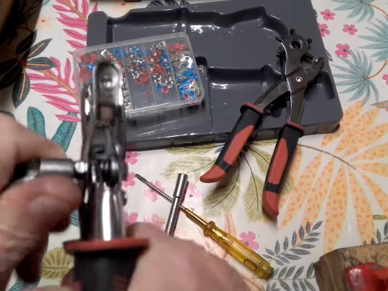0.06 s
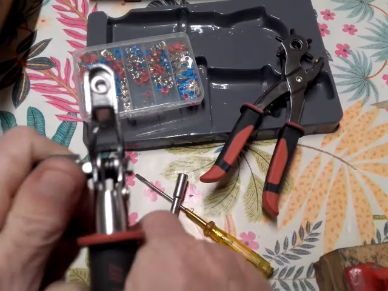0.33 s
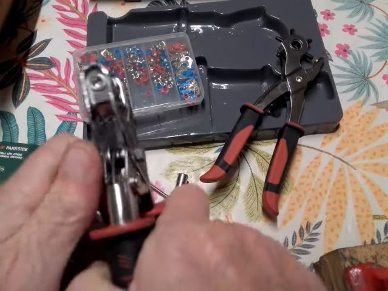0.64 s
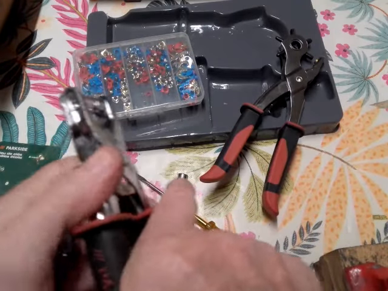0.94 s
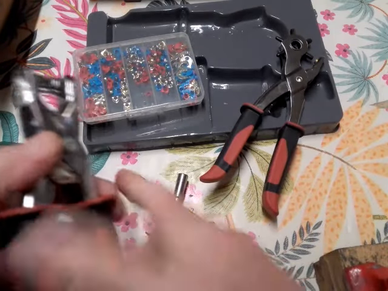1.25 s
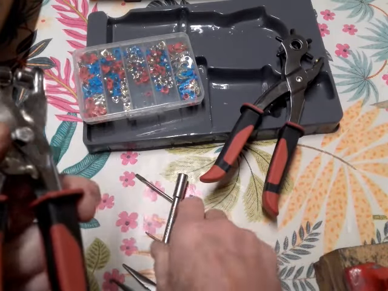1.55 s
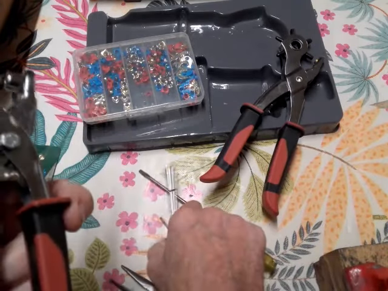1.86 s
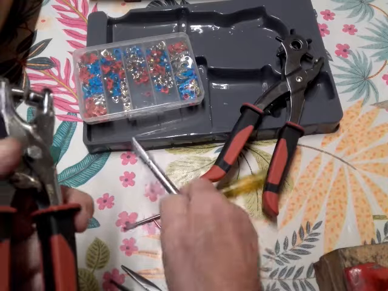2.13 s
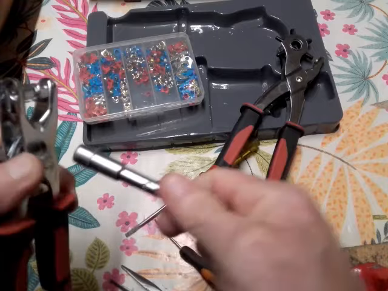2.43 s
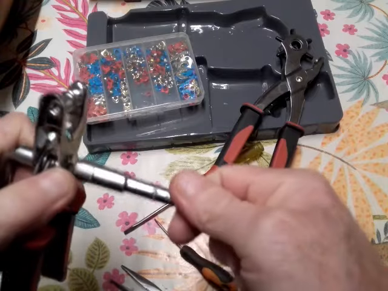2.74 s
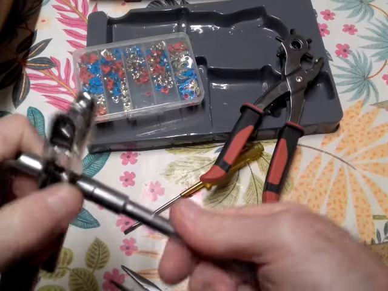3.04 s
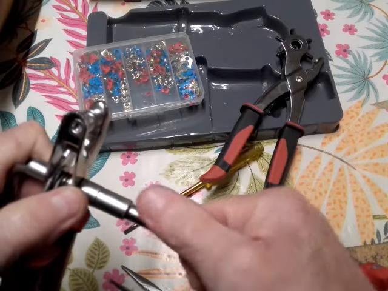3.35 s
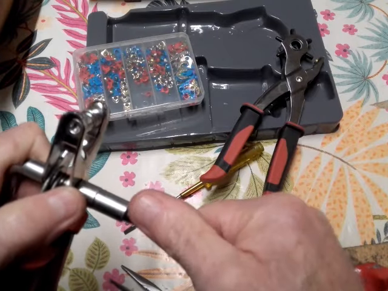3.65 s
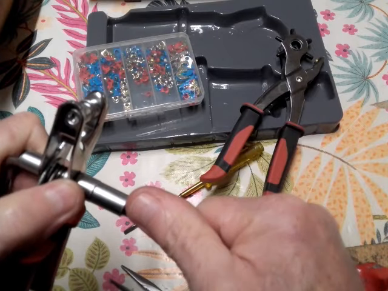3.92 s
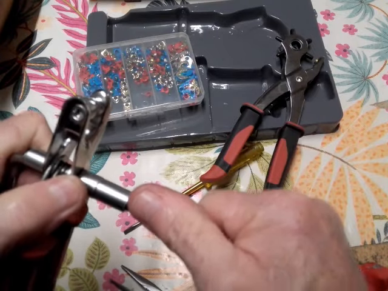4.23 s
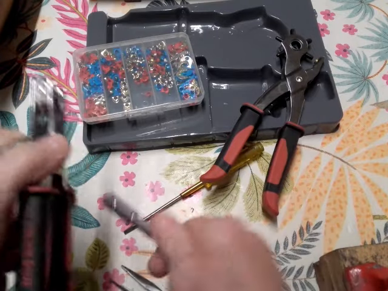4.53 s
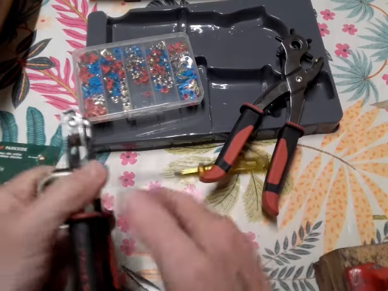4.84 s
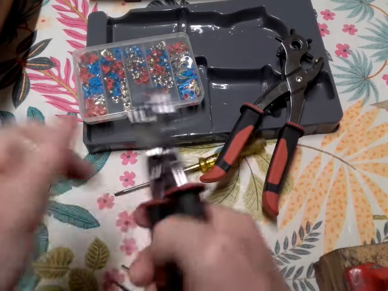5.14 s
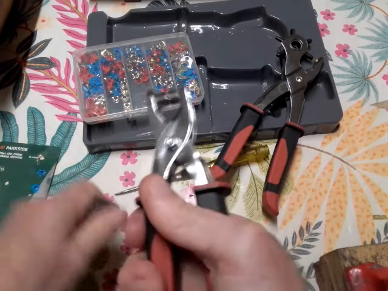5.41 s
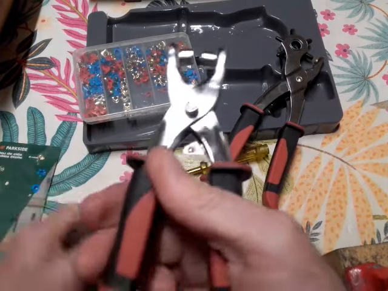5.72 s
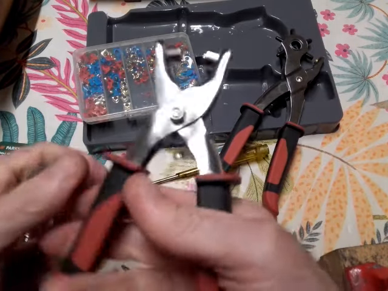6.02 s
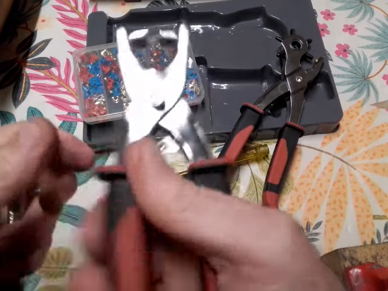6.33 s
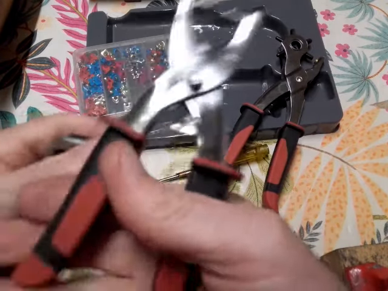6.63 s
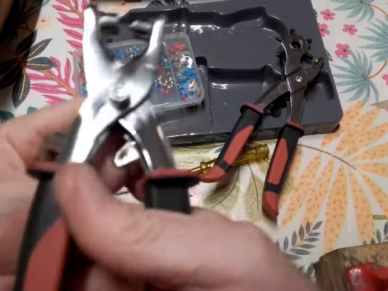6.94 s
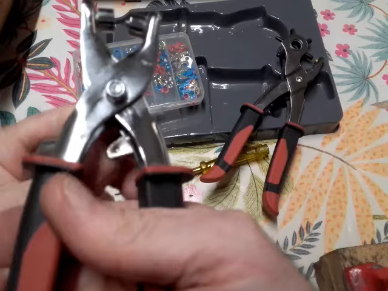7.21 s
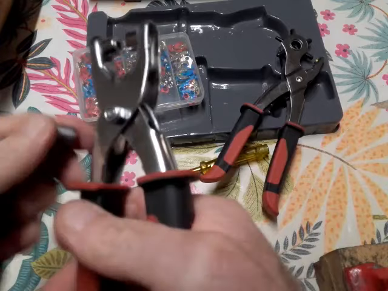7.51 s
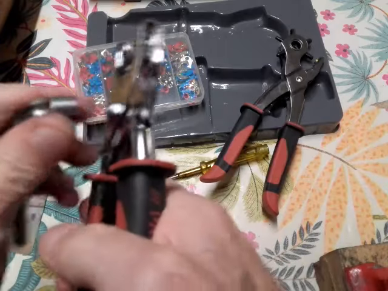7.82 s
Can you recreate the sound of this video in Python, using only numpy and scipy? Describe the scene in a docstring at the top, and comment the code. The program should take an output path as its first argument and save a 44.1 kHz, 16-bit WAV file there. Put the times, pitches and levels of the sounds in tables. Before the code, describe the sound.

Over low hiss in a small room, the loose joint of metal pliers clicks now and then. A metal tube clinks and knocks as it is lifted, and taps lightly against the jaws. Then comes the loudest sound: the tube falls on the table near the microphone, clacking several times and ringing thinly as it tumbles. Afterwards the pliers click again and rub softly as they swing open and shut.

```python
"""Faint clicks of steel eyelet pliers over low hiss: one microphone near a table in a small, quiet room.
The loose joint clicks and rubs as the jaws swing. A steel tube is picked up with a clink, tried in the
jaws, then dropped: it bounces on the tabletop, its bending modes ringing as it tumbles.
The room answers briefly, and the recorder's noise suppressor turns the quiet tails down."""
import sys
import numpy as np
from scipy import signal
from scipy.fft import rfft, irfft, next_fast_len
from scipy.io import wavfile
from scipy.ndimage import uniform_filter1d, map_coordinates

SR = 44100
rng = np.random.default_rng(int(sys.argv[2]) if len(sys.argv) > 2 else 0)


def dump_mix(stems):
    """Bounce the given channels to the path in sys.argv[1] as a 16-bit WAV at rate SR."""
    frames = np.atleast_2d(stems).T  # one column per channel
    limited = np.clip(frames, -1, 1)  # hard clip at full scale
    pcm = np.round(limited * 32767).astype(np.int16)
    wavfile.write(sys.argv[1], SR, pcm)


N = 347067
T = np.arange(SR * 3 // 5) / SR  # time axis of one hit
HZ = np.fft.rfftfreq(len(T), 1 / SR)


def amp(db):
    """Decibels to amplitude."""
    return 10 ** (np.asarray(db) / 20)


def along(points, hz):
    """Interpolate (f/Hz, value) points on a log frequency axis."""
    f, v = np.transpose(points)
    return np.interp(np.log(hz + 1), np.log(f + 1), v)


def fade(t60, t=T):
    """Exponential decay by 60 dB in t60 seconds."""
    return np.exp(-np.log(1000) * t / t60)


def tone(hz, t60):
    """One struck mode."""
    return np.sin(2 * np.pi * hz * T) * fade(t60)


def chatter(t60):
    """The dying burst of micro-impacts in one contact."""
    return rng.standard_normal(len(T)) * fade(t60)


def struck(x):
    """Scale a hit to rms 1 over its first 6 ms."""
    return x / np.sqrt(np.mean(x[T < .006] ** 2) + 1e-20)


def coloured(x, db):
    """Causal filter with the given gain on the HZ grid."""
    cepstrum = irfft(np.log(np.maximum(amp(db), 1e-6)), len(T))
    fold = 1 + np.sign(len(T) / 2 - np.arange(len(T)))
    fold[0] = 1
    return irfft(rfft(x) * np.exp(rfft(cepstrum * fold)), len(T))


def shelf(db, corner_hz):
    """A step of db above the corner."""
    return db * HZ ** 6 / (HZ ** 6 + corner_hz ** 6)


def radiated(x, corner_hz):
    """A small body radiates little below its corner."""
    return coloured(x, -10 * np.log10(1 + (corner_hz / (HZ + 1)) ** 4))


def resonate(x, modes):
    """Pass x through parallel (f/Hz, width/Hz, level/dB) resonances."""
    response = sum(amp(db) * 1j * HZ * width / (hz * hz - HZ ** 2 + 1j * HZ * width)
                   for hz, width, db in modes)
    return irfft(rfft(x) * response, len(T))


def add(track, s, x):
    """Mix x into the track at time s."""
    part = track[max(round(s * SR), 0):][:len(x)]
    part += x[:len(part)]


# Noise floor at the microphone: f/Hz, relative density/dB
FLOOR_SPECTRUM = [(12, -29), (20, 3.5), (22, -16.5), (32, -26.5), (65, -14), (187, -12.5), (233, -12),
                  (308, -11.5), (469, -11.5), (775, -13), (1600, -16.5), (6290, -30.5), (13700, -24),
                  (15800, -26)]
def hiss(rms_db=-65.5):
    """Still room air and the microphone's own hiss, ahead of the noise suppressor."""
    gain = amp(along(FLOOR_SPECTRUM, np.fft.rfftfreq(N, 1 / SR)))
    noise = irfft(rfft(rng.standard_normal(N)) * gain, N)
    return amp(rms_db) * noise / np.std(noise)


# Reverberation of the small room: f/Hz, t60/s
ROOM_DECAY = [(150, .38), (300, .3), (600, .28), (1500, .26), (4000, .235), (8000, .23), (15000, .2)]
def room(x, build_s=0.0033):
    """The diffuse answer of the room, different for each place of contact."""
    hz, t, bands = signal.stft(rng.standard_normal(len(T)), SR, nperseg=256)
    bands = bands * fade(along(ROOM_DECAY, hz)[:, None], t)
    tail = signal.istft(bands, SR, nperseg=256)[1][:len(T)]
    tail *= 1 - np.exp(-(T / build_s) ** 2)
    return signal.fftconvolve(x, tail / np.linalg.norm(tail))[:len(T)]


# Contacts of the pliers over the table: t/s, level/dB, treble shelf/dB, favoured mode f/Hz
PLIER_CONTACTS = [(0.023, -55.5, -9, 2120), (0.1283, -54.5, -11, 1980), (0.594, -29.5, -1, 6800),
                  (0.598, -30, -6, 3350), (.682, -47, -4.5, 3500), (.855, -50.5, -3, 3940),
                  (1.142, -51.5, 4.5, 2130), (1.224, -63, 2, 2200), (2.7337, -35, -12, 2920),
                  (2.785, -53, -7, 2520), (2.804, -51.5, -11, 2430), (2.8568, -47.5, -3.5, 3130),
                  (2.883, -52, -11, 1130), (2.943, -64, -11, 1130), (2.986, -51, -12.5, 2700),
                  (3.004, -56, -11, 1050), (3.027, -48, -7.5, 3190), (3.1008, -35.5, -9, 3160),
                  (3.158, -48.5, -4, 1110), (3.1712, -27.5, -2, 3030), (3.397, -52, 2, 4240),
                  (3.4033, -41, 7, 3960), (5.1644, -40, 7, 1100), (5.519, -66, 15, 3280),
                  (5.5273, -40, -11, 3400), (7.411, -61.5, 3, 5080)]
# Resonances of the jaws: f/Hz, width/Hz, level/dB
JAW_MODES = [(3210, 360, -9.5), (3412, 180, 3), (3960, 220, -4.5), (5910, 63, -13), (6717, 123, 5),
             (7510, 140, -11.5), (7860, 34, -8.5), (8550, 120, -5), (10350, 116, -3.5), (11440, 44, 0.5)]
# Spectrum of the steel's click: f/Hz, level/dB
STEEL_SPECTRUM = [(100, -36.5), (600, -32.5), (1200, -45.5), (1700, -7.5), (2300, 2.5), (3300, 1),
                  (4200, 0.5), (4900, -2.5), (6600, 6.5), (8500, -2), (12000, -12), (14000, -15),
                  (16000, -45.5)]
# Spectrum of the knock in the handles: f/Hz, level/dB
HANDLE_SPECTRUM = [(50, -60.5), (130, -15.5), (300, -7.5), (700, -2), (1100, 0.5), (1600, -0.5), (2500, 3),
                   (5000, -59.5)]
def pliers(ring_db=5, chatter_t60=0.023, fist_from_s=5.35):
    """Each contact chatters in the hand-damped jaws and knocks the handles; harder ones are more steel."""
    out = np.zeros(N)
    for s, db, treble_db, ping_hz in PLIER_CONTACTS:
        force_db = db + 45  # relative to a firm click
        ping_db = -0.5 - 0.34 * force_db
        knock_db = -7.5 - 0.4 * force_db
        force = chatter(chatter_t60)
        steel = coloured(force, along(STEEL_SPECTRUM, HZ)) + amp(ring_db) * resonate(force, JAW_MODES)
        steel = struck(coloured(steel, shelf(treble_db, corner_hz=4930)))
        ping = struck(tone(ping_hz, t60=0.0176))  # grip and contact point favour one mode
        click = struck(radiated(steel + amp(ping_db) * ping, corner_hz=1000))
        # the long arms bend, at a lower pitch once they lie in the fist
        lever_hz = (1097 if s < fist_from_s else 410) * rng.normal(1, 0.0153)
        lever = struck(radiated(tone(lever_hz, t60=0.054), corner_hz=284))
        handles = struck(coloured(chatter(chatter_t60), along(HANDLE_SPECTRUM, HZ)))
        knock = amp(knock_db) * struck(handles + amp(-2) * lever)
        if 2.6 < s < 3.3:  # the tube lies between the jaws: its lowest mode answers
            click += amp(knock_db - 5) * struck(radiated(tone(2520, t60=.09), corner_hz=1000))
        add(out, s, amp(db) * (click + knock + amp(-11) * room(steel) + amp(-7) * room(knock)))
    return out


# Rubs as the jaws swing or the tube slides between them: t/s, level/dB
STEEL_RUBS = [(.516, -68.5), (0.614, -49.5), (2.766, -63), (3.135, -63.5), (5.514, -65), (5.712, -70),
              (6.084, -68.5), (6.435, -62), (6.625, -70), (6.747, -69)]
# Resonances of the rubbing joint: f/Hz, width/Hz, level/dB
JOINT_MODES = [(1948, 330, 5.5), (3500, 680, 0.5), (6600, 910, -1), (7850, 460, -6)]
def joint(grain_db=4, room_db=-8, swell_s=0.016, peak_s=.1):
    """Tiny slips of steel on steel swell and fade with each swing of the jaws."""
    out = np.zeros(N)
    for s, db in STEEL_RUBS:
        friction = rng.standard_normal(len(T)) * amp(grain_db * rng.standard_normal(len(T)))
        slips = resonate(friction, JOINT_MODES)
        rub = slips / np.std(slips) * np.exp(-((T - peak_s) / swell_s) ** 2)
        add(out, s - peak_s, amp(db) * (rub + amp(room_db) * room(rub)))
    return out


# Blows on the tabletop near the microphone: t/s, level/dB, contact f/Hz
TABLE_BLOWS = [(1.771, -61.5, 202), (1.824, -58, 300), (1.879, -50.5, 440), (1.9294, -34.5, 1500),
               (1.9355, -37.5, 372), (1.992, -37, 700), (2.0345, -37, 620), (2.075, -47, 556),
               (2.498, -46.5, 1680), (4.866, -16.5, 930), (4.903, -24.5, 845), (4.923, -16, 1174),
               (5.0172, -33.5, 1380), (5.0427, -18.5, 980), (5.2151, -47, 1480)]
# Modes of the table's board: f/Hz, level/dB, t60/s
BOARD_MODES = [(148.9, -31.5, 0.14), (251.8, -21.5, 0.12), (326.5, -21, 0.09), (484.5, -4, 0.033),
               (736, -5, 0.032), (1130, -10.5, 0.046), (1500, -9.5, 0.0377), (2430, -9.5, .02)]
# Shudder of table and room: f/Hz, level/dB
SHUDDER_SPECTRUM = [(60, -41.5), (90, -25), (135, -2.5), (210, -3.5), (300, 4.5), (500, 6), (1000, 4.5),
                    (1500, 6), (2000, -0.5), (2600, 2), (4000, -10), (16000, -25.5)]
def tabletop(board_db=-2, grit_db=-38, shudder_db=-4.5, rebound_s=0.001782, bounce_s=.019):
    """A cloth-softened push, its rebound and the board's modes; table and room shudder on."""
    out = np.zeros(N)
    bounces = [(s + bounce_s, db - 13.5, hz) for s, db, hz in TABLE_BLOWS]  # a small one after each blow
    for s, db, contact_hz in TABLE_BLOWS + bounces:
        pulse_time = np.pi * contact_hz * (T - .0008)
        push = (1 - 2 * pulse_time ** 2) * np.exp(-pulse_time ** 2)
        rebound_lag = round(abs(rebound_s * rng.normal(1, 0.22)) * SR)
        push = push - .55 * np.roll(push, rebound_lag)
        board = np.zeros(len(T))
        for hz, mode_db, t60 in BOARD_MODES:
            mode = amp(mode_db + rng.normal(0, 4.2)) * tone(hz * rng.normal(1, 0.039), t60)
            board += mode / (1 + (hz / (2 * contact_hz)) ** 4)  # soft blows barely reach high modes
        board *= 1 - np.exp(-T / 0.0042)
        blow = push + amp(board_db) * board + amp(grit_db) * chatter(t60=0.017)
        blow = struck(radiated(blow, corner_hz=170))
        softness_db = along(SHUDDER_SPECTRUM, HZ) + shelf(-17.5, corner_hz=2 * contact_hz)
        shudder = room(struck(coloured(T == 0, softness_db)))
        add(out, s, amp(db) * (blow + amp(shudder_db) * shudder))
    return out


# Bending modes of the tube: f/Hz, level/dB, free t60/s, added damping t60/s, beat f/Hz, beat peak t/s
TUBE_MODES = [(2520, -13, .9, .06, 9, .04), (3060, -10, .1, .15, 5, 0), (5012, -13, .12, .15, 5, 0),
              (9017, -8, .12, .15, 5, 0), (10510, -18, .7, .15, 9, .05), (5744, -13.5, 7, .2, 4.5, .18),
              (6531, -8, 5, .12, 5, .145), (7720, -2.5, .38, .4, 11, .04),
              (12320, -7.5, 1.6, .13, 1.5, .04)]
def tube_ring(free_s, flutter_db=3, flutter_per_s=45):
    """Close mode pairs beat and flutter as the tube turns; hand or table damps them after free_s."""
    ring = np.zeros(len(T))
    for hz, db, t60, held_t60, beat_hz, peak_s in TUBE_MODES:
        phase = 2 * np.pi * (hz * T + rng.random())
        pair = np.sin(phase) + .7 * np.sin(phase + 2 * np.pi * beat_hz * (T - peak_s))
        wander = map_coordinates(rng.standard_normal(size=128), [T * flutter_per_s], order=1)
        decay = fade(t60) * fade(held_t60, np.maximum(T - free_s, 0))
        ring += amp(db + flutter_db * wander) * decay * pair
    return ring


# Hard contacts of the tube: t/s, level/dB, top-octave shelf/dB, ring gain/dB
TUBE_CONTACTS = [(1.885, -53, -9, -4), (1.914, -53.5, -10, -7), (1.930, -29, 18, -31),
                 (1.935, -33.5, -19, -24), (1.992, -33.5, 9.5, -19.5), (2.031, -40, 6, -11),
                 (2.191, -55, -0.5, -33), (2.216, -56.5, -3.5, -21), (2.5015, -60.5, -9.5, -29),
                 (4.8631, -29.5, -9, -24), (4.878, -41, -7, -18), (4.939, -47.5, 3, -21),
                 (5.019, -47, -2.5, -23.5), (5.214, -55, -7, -32)]
# Spectrum of the crack at each contact: f/Hz, level/dB
CRACK_SPECTRUM = [(60, -50.5), (500, -23), (1500, -2.5), (3100, -5.5), (4000, -16), (5000, -3),
                  (5700, -10.5), (7100, 2.5), (8200, -2), (9200, 0), (11000, -10.5), (13600, -4.5),
                  (15000, -15.5), (16000, -30)]
def tube(room_db=-6.5, drop_s=4.8617, drop_ring_db=-35, tumble_s=0.22):
    """A bright crack at each contact, then the tube's pure ring: short in the hand, long as it tumbles."""
    out = np.zeros(N)
    for s, db, lift_db, ring_db in TUBE_CONTACTS:
        hardness_db = shelf(lift_db, corner_hz=8740)  # a harder contact brightens crack and ring alike
        crack = struck(coloured(chatter(t60=.015), along(CRACK_SPECTRUM, HZ) + hardness_db))
        ring = coloured(tube_ring(free_s=.012), hardness_db)
        add(out, s, amp(db) * (crack + amp(room_db) * room(crack) + amp(ring_db) * ring))
    add(out, drop_s, amp(drop_ring_db) * tube_ring(free_s=tumble_s))
    return out


def suppressor(x, threshold_db=9, depth_db=4):
    """Bands that sink toward their own noise floor are turned down, so tails end early."""
    bands = signal.stft(x, nperseg=256)[2]
    power = uniform_filter1d(np.abs(bands) ** 2, size=11, axis=1)  # across frequency
    power = uniform_filter1d(power, size=5, axis=2)  # across time
    excess = power / np.median(power, axis=2, keepdims=True) / amp(threshold_db) ** 2
    gain = amp(-depth_db / (1 + excess ** 2))
    return signal.istft(bands * gain, nperseg=256)[1][:, :N]


def scene():
    """Pliers, tube and table in the quiet room, at one microphone."""
    return (pliers() + joint() + tube() + tabletop() + hiss())[None]


def record(dry):
    """The recorder suppresses noise and keeps nothing above 16 kHz."""
    size = next_fast_len(N + SR)
    passband = np.clip((16000 - np.fft.rfftfreq(size, 1 / SR)) / 300, 0, 1)
    return irfft(rfft(suppressor(dry), size) * passband, size)[:, :N]


dry = scene()
out = record(dry)
dump_mix(out)
```